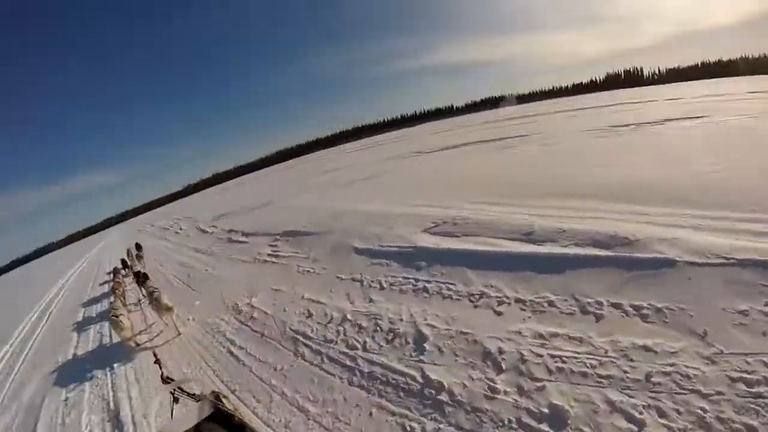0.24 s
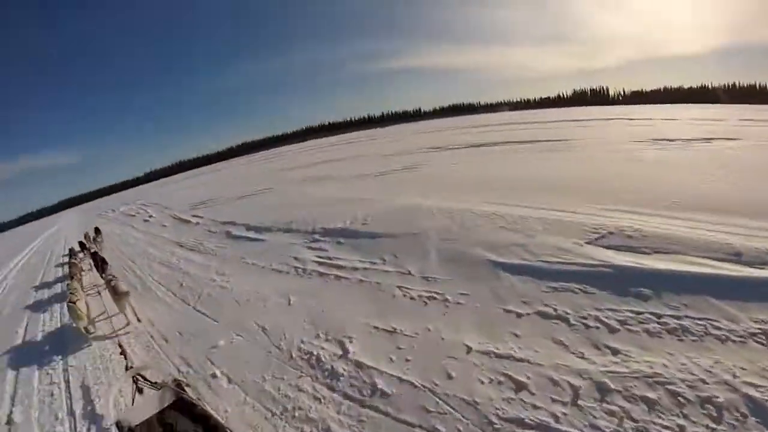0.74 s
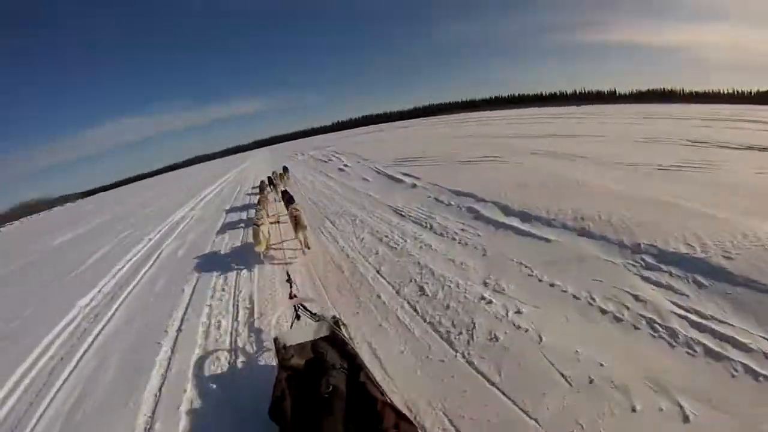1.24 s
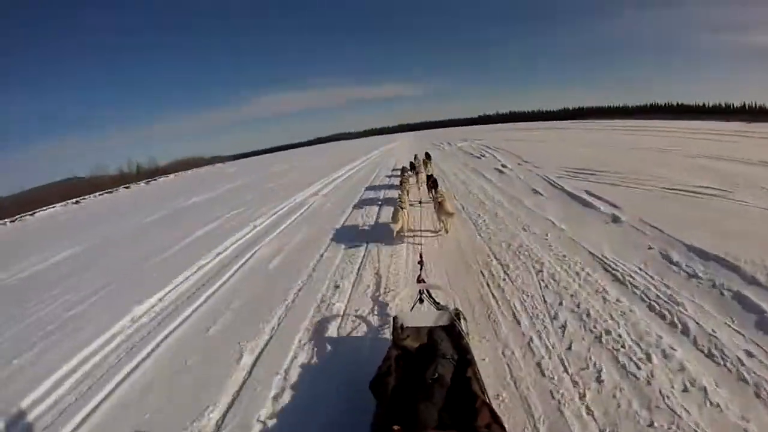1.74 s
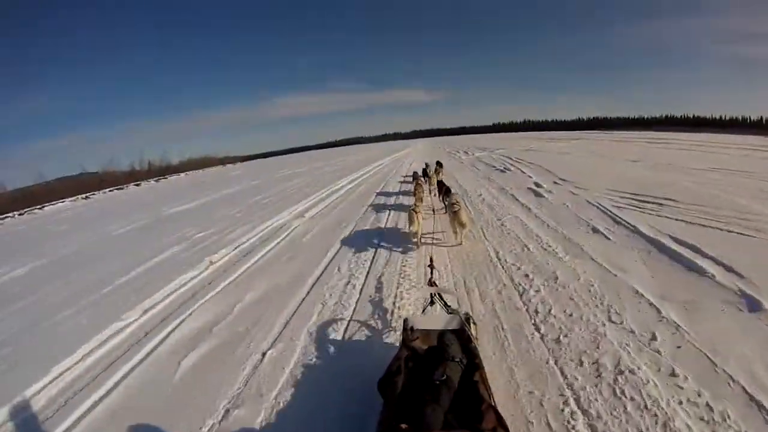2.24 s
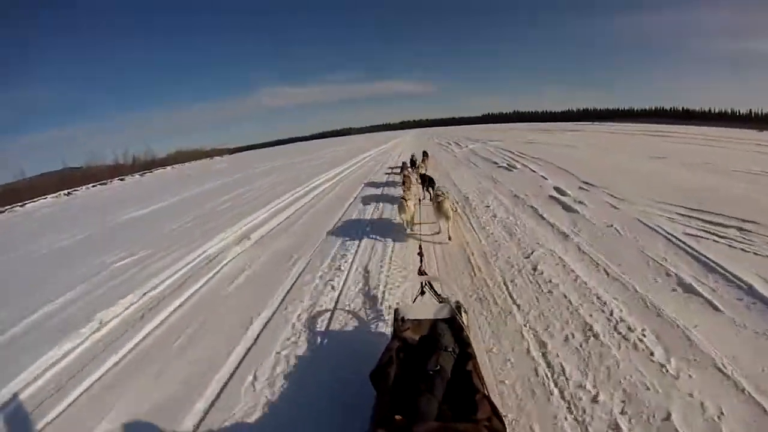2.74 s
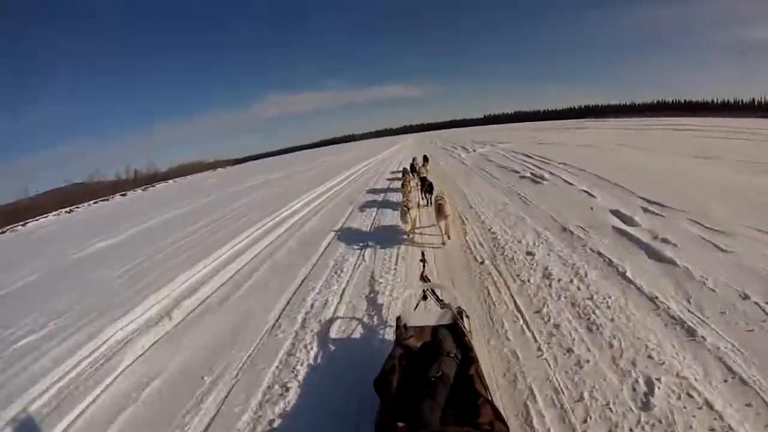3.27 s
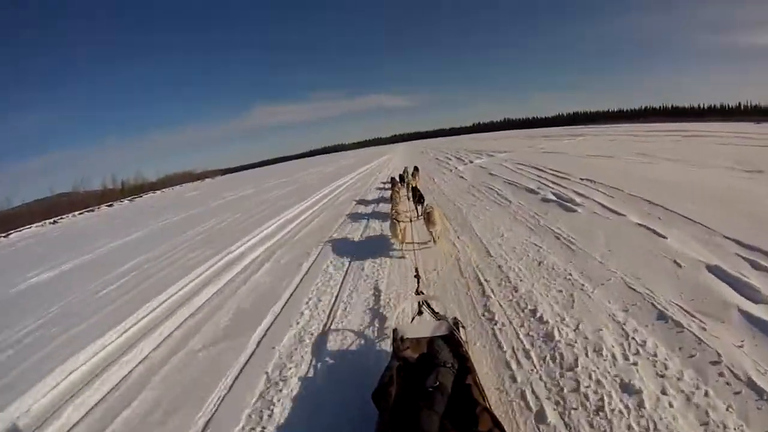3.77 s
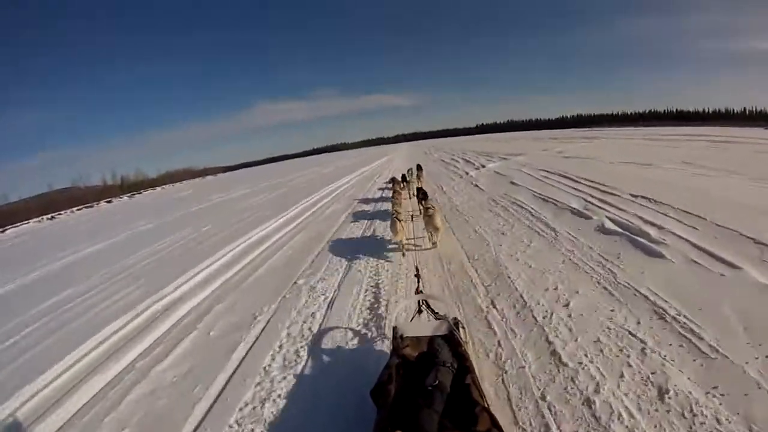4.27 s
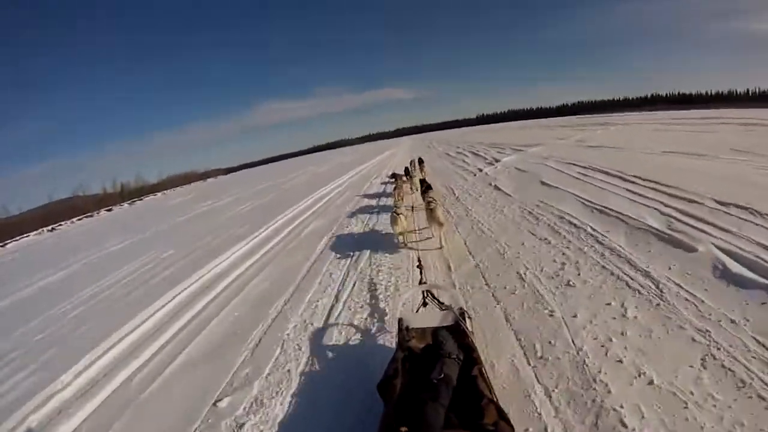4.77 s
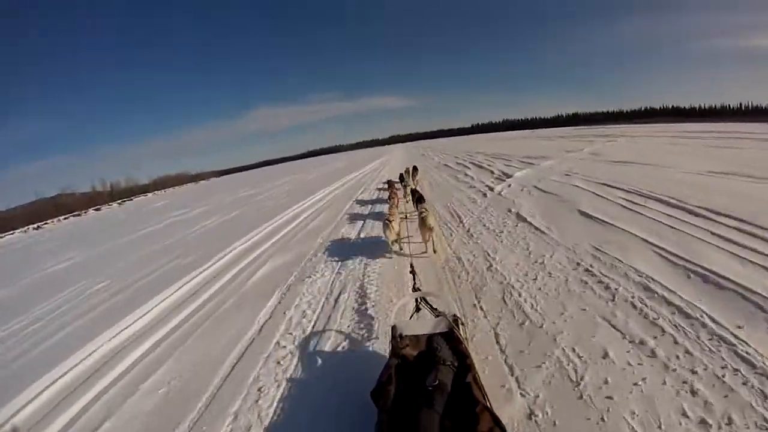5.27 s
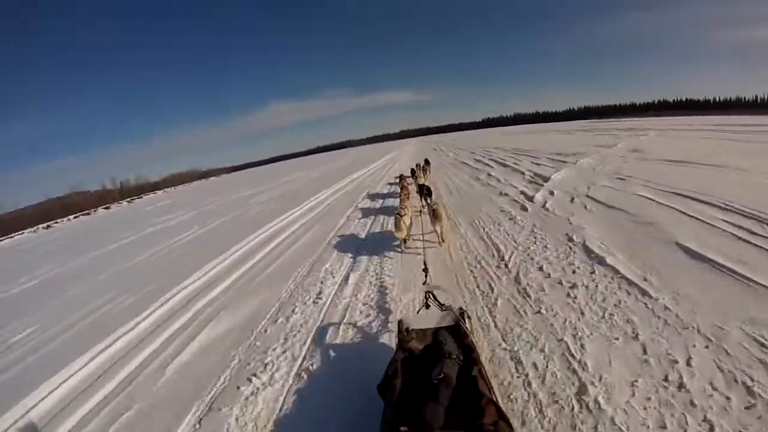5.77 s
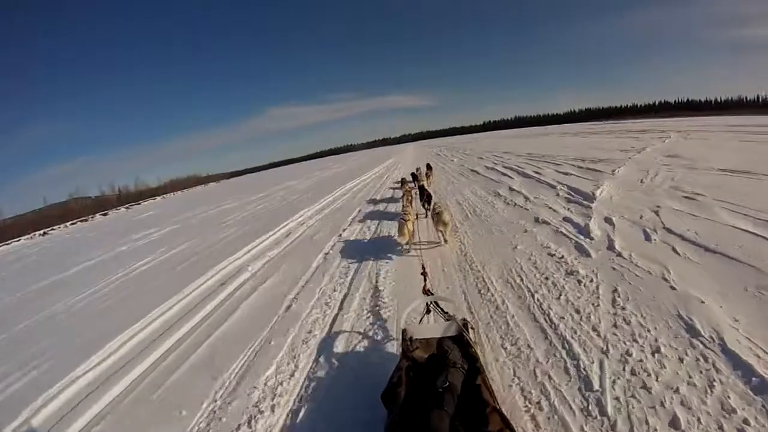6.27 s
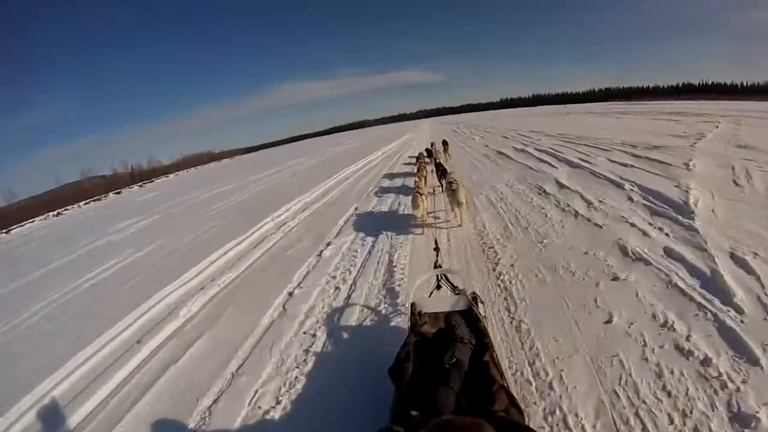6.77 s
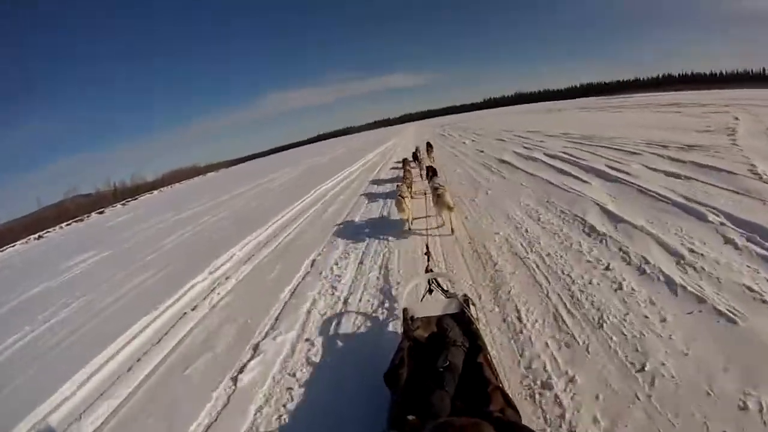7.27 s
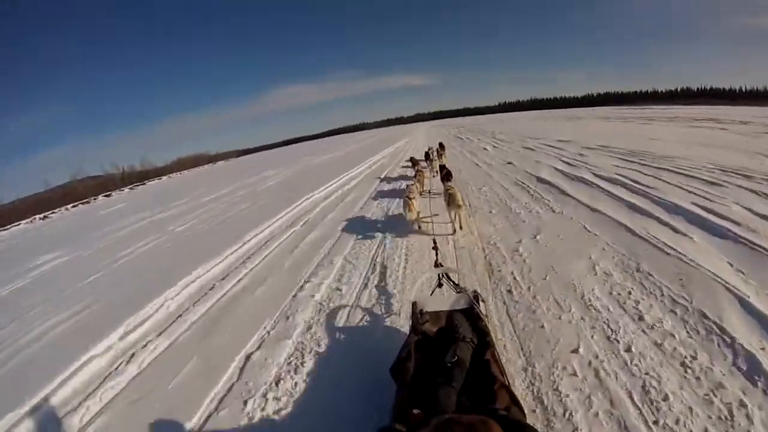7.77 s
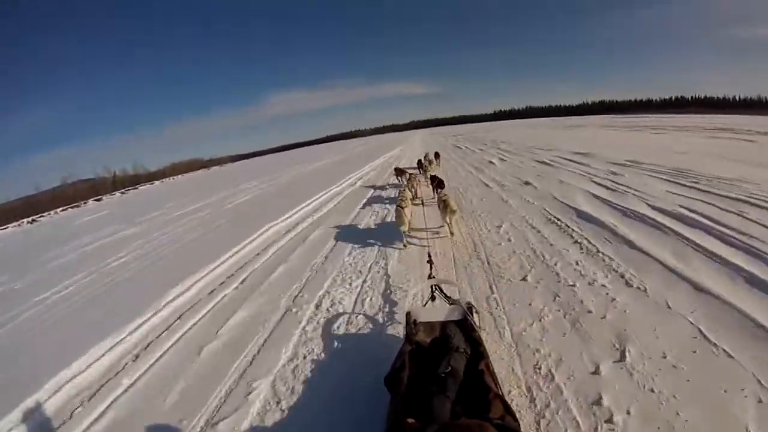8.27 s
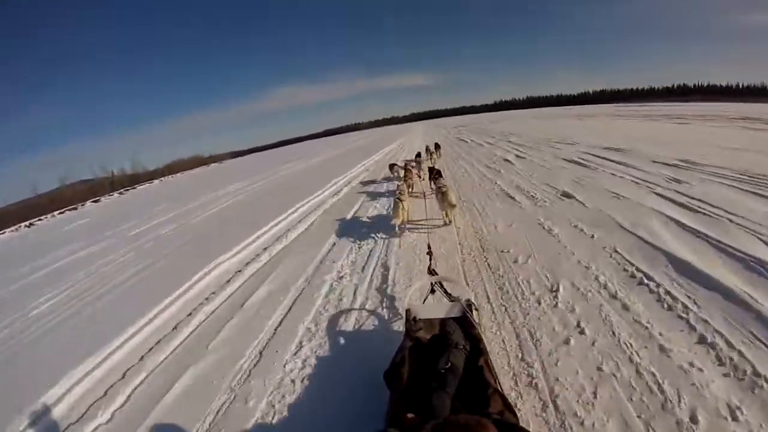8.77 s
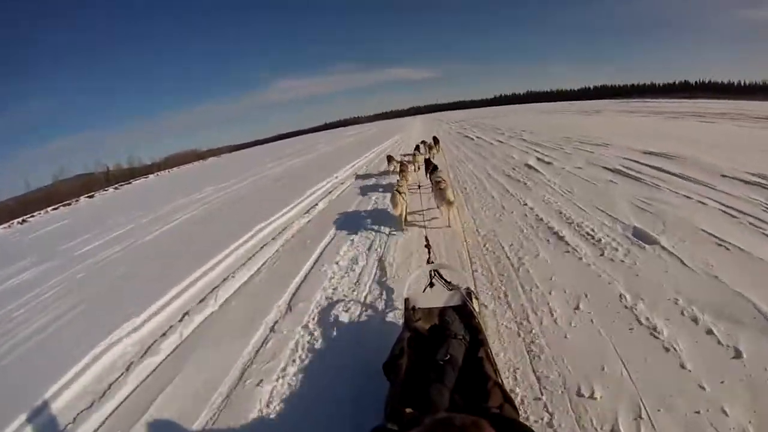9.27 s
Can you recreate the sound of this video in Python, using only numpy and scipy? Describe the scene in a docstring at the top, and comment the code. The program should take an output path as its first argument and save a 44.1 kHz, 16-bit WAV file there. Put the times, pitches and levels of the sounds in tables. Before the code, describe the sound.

Low wind rumbles in gusts against a microphone inside a closed plastic case on a moving dog sled. Beneath it the runners hiss, crunch and faintly squeak on packed snow, the sled drones, and bumps knock hollowly. The wind drops briefly after about three seconds, then harder buffets thump the case, bringing short crackles and a few sharp clicks. Everything is close, muffled and without echo.

```python
"""A dog sled glides over packed snow, heard from inside a closed plastic case worn by the driver.
From the start, head wind rumbles on the case in gusts, the runners hiss, crunch and now and then squeak,
and bumps in the trail knock hollowly. The sled's low drone sinks, then swells at about 1.5 s.
The wind drops away around 3.5 s; from about 4 s on, hard buffets thump the case and make it crackle,
and the mount clicks under strain while the sled runs on."""
import sys
import numpy as np
from scipy import signal
from scipy.fft import rfft, irfft, next_fast_len
from scipy.io import wavfile
from scipy.ndimage import uniform_filter1d

SR = 44100
rng = np.random.default_rng(int(sys.argv[2]) if len(sys.argv) > 2 else 0)


def waveform_to_disk(signal):
    """Save audio, clipped to [-1, 1], as 16-bit WAV at the path in sys.argv[1]."""
    frames = np.transpose(np.atleast_2d(signal))
    scaled = np.clip(frames, -1, 1) * 32767
    samples = np.round(scaled).astype(np.int16)
    wavfile.write(sys.argv[1], SR, samples)


N = 419391
T = np.arange(N) / SR

# the runners on the snow: time_s, glide_db, crust_db (the crunch relative to the glide)
RUNNER_LEVELS = [(0, -47, -14), (0.35, -50.5, -8.5), (0.63, -54, -14), (1.0, -54.5, -9.5),
                 (1.25, -51.5, -11), (2.35, -50.5, -11), (2.7, -53, -9), (3.25, -50.5, -11),
                 (3.55, -52.5, -9.5), (3.85, -49, -11), (4.45, -50.5, -10), (4.85, -50.5, -9),
                 (5.02, -51, -12), (5.2, -52, -8.5), (5.5, -51, -10.5), (5.85, -52, -10), (6.3, -52, -9.5),
                 (6.8, -54.0, -11.5), (7.1, -53.5, -9.5), (7.27, -52.5, -10), (7.45, -53, -10.5),
                 (8.3, -52.5, -9.5), (8.48, -53.5, -12), (8.85, -51.0, -9), (9.5, -53, -10)]


def undb(db):
    """Decibels to gain."""
    return 10 ** (np.asarray(db) / 20)


def unit(x):
    """Scale to rms 1."""
    return x / np.sqrt(np.mean(x ** 2))


def curves(table):
    """One envelope per column of a timed table, in straight lines between its points."""
    time_s, *columns = np.transpose(table)
    return [np.interp(T, time_s, column) for column in columns]


def colour(x, points):
    """Equalise x by (freq_hz, gain_db) points, rolling off beyond both ends; rms 1."""
    hz, db = np.transpose(points)
    size = next_fast_len(N)
    f = np.maximum(np.fft.rfftfreq(size, 1 / SR), 1)
    skirts = np.minimum(f / hz[0], 1) * np.minimum(hz[-1] / f, 1) ** 2
    gain = undb(np.interp(np.log(f), np.log(hz), db))
    return unit(irfft(rfft(x, size) * skirts * gain, size)[:N])


def resonate(x, hz, width_hz):
    """One resonance with gain 1 at its centre."""
    return signal.lfilter(*signal.iirpeak(hz, hz / width_hz, fs=SR), x)


def walk(per_s):
    """A smooth random wobble: levels held 1 / per_s seconds and slewed twice; rms 1."""
    hold = int(SR / per_s)
    stairs = np.repeat(rng.standard_normal(N // hold + 1), hold)
    return unit(uniform_filter1d(uniform_filter1d(stairs, hold), hold)[:N])


def grains(per_s, spread_db):
    """Grit: random tiny impulses, a few larger than the rest; rms 1."""
    hit = rng.random(N) < per_s / SR
    size = undb(spread_db * np.minimum(rng.exponential(size=N), 4))
    return unit(hit * size * rng.choice([-1, 1], N))


def tap(hz, db, size=512):
    """The tightest transient with a given spectrum (minimum phase), at peak 1."""
    f = np.maximum(np.fft.rfftfreq(size, 1 / SR), 1)
    gain = undb(np.interp(np.log(f), np.log(hz), db))
    cepstrum = irfft(np.log(gain))
    response = irfft(np.exp(rfft(2 * cepstrum[:size // 2], size)))
    return response / np.max(np.abs(response))


def add(out, start_s, sound):
    """Mix a sound in at start_s."""
    i = max(int(start_s * SR), 0)
    out[i:i + len(sound)] += sound[:max(N - i, 0)]


def hiss(level_db=-69):
    """A faint, even bed of hiss."""
    # tone of the hiss: freq_hz, gain_db
    hiss_eq = [(1000, 6.5), (3000, 3), (5000, 0), (8000, -1), (10000, -2.5), (12300, -1.5), (13500, -12.5),
               (15000, -8)]
    return undb(level_db) * colour(rng.standard_normal(N), hiss_eq)


def drone(trim_db=-0.5, swell_db=1.0):
    """The uneven trail shakes the sled into a low, swelling drone."""
    # how hard the sled shakes: time_s, level_db
    shaking = [(0, -52), (.7, -59.5), (1.35, -65), (1.6, -48), (2.3, -52.5), (3.1, -57), (3.8, -49.5),
               (4.6, -50), (5.4, -51), (5.75, -49), (6.3, -51), (6.9, -53.5), (7.6, -49), (8.4, -54.5),
               (9.0, -48), (9.5, -53)]
    # tone of the sled's hum: freq_hz, gain_db
    drone_eq = [(70, -17), (105, 0), (132, 4.5), (160, -10), (200, -14), (300, -30)]
    level_db, = curves(shaking)
    envelope = undb(level_db + trim_db + swell_db * walk(9))
    return envelope * colour(rng.standard_normal(N), drone_eq)


def sizzle(usual_db=-78.5, db_per_crunch_db=1.3, flicker_db=2.0):
    """The snow sizzles in two narrow, flickering bands, more so where the runners crunch harder."""
    # resonances of the sizzle: centre_hz, width_hz, gain_db
    modes = [(4590, 300, -2.5), (5176, 440, -0.5)]
    glide_db, crust_db = curves(RUNNER_LEVELS)
    bite_db = glide_db + crust_db - np.median(glide_db + crust_db)
    bands = np.zeros(N)
    for hz, width_hz, gain_db in modes:
        flicker = undb(gain_db + flicker_db * walk(24))
        band = resonate(rng.standard_normal(N), hz, width_hz)
        bands += flicker * resonate(band, hz, width_hz)  # twice through for steeper skirts
    return unit(bands) * undb(usual_db + db_per_crunch_db * bite_db)


def skids():
    """A runner edge shaves the crust in uneven slips: thin squeaks, each a rough, gliding noise band."""
    # squeaks on the crust: start_s, length_s, start_hz, end_hz, width_hz, level_db
    squeaks = [(0.18, 0.28, 2160, 2600, 560, -59), (0.204, .36, 1593, 1700, 900, -62),
               (0.292, .17, 4800, 4450, 380, -70), (0.3, .8, 7120, 6950, 1200, -77),
               (0.798, 0.19, 2270, 2350, 300, -64), (1.242, 0.23, 2250, 2400, 400, -62),
               (1.27, .15, 4800, 4600, 500, -72), (2.339, 0.27, 1650, 2000, 300, -60),
               (2.949, 0.73, 5130, 5150, 900, -75), (3.599, 0.45, 5230, 5170, 800, -71),
               (3.79, .16, 2245, 2360, 400, -59), (3.888, .011, 6200, 5900, 2200, -55),
               (4.42, 0.13, 2250, 2350, 400, -59.5), (4.2, 0.52, 5050, 5050, 1200, -70.5),
               (5.104, 0.24, 1800, 2100, 500, -61), (5.6, 0.2, 2270, 2360, 350, -62),
               (7.325, 0.053, 5170, 5110, 170, -67), (7.355, .1, 4780, 4640, 260, -70),
               (7.371, 0.16, 2275, 2380, 220, -61), (7.615, .045, 4700, 4590, 120, -72),
               (7.74, .08, 4450, 4690, 120, -71), (7.835, .05, 4480, 4680, 120, -74),
               (9.145, .06, 5050, 5100, 260, -70), (9.202, 0.043, 5180, 5220, 200, -65),
               (9.25, 0.09, 5300, 5250, 300, -67)]
    out = np.zeros(N)
    for start_s, length_s, start_hz, end_hz, width_hz, level_db in squeaks:
        n = int(length_s * SR)
        lowpass = signal.butter(2, width_hz / 2, fs=SR, output="sos")
        rasp = unit(signal.sosfilt(lowpass, rng.standard_normal((2, n))))
        phase = 2 * np.pi * np.cumsum(np.linspace(start_hz, end_hz, n)) / SR
        band = (rasp[0] * np.sin(phase) + rasp[1] * np.cos(phase)) / np.sqrt(2)
        add(out, start_s, undb(level_db) * np.hanning(n) * band)
    return out


def runners():
    """Runners rub the packed snow and crush its grains; the contact pressure flutters."""
    # smooth sliding, heard through the case: freq_hz, gain_db
    slide_eq = [(90, 7), (190, 7.5), (260, 4), (350, 2), (440, 4), (525, 4.5), (630, 0), (800, -4),
                (950, -3), (1250, -2.5), (1550, -10.5), (2200, -23), (3500, -33.5)]
    # breaking crust, heard through the case: freq_hz, gain_db
    crunch_eq = [(700, -26), (1300, -7), (1600, -0.5), (1900, 0.5), (2300, 5), (2550, -3.5), (2900, -9.5),
                 (3500, -11.5), (4200, -20), (5700, -18.5), (6200, -15), (7000, -22.5), (12000, -34),
                 (15000, -46)]
    glide_db, crust_db = curves(RUNNER_LEVELS)
    contact = walk(45)
    slide = colour(rng.standard_normal(N) + 0.5 * grains(per_s=900, spread_db=2), slide_eq)
    crunch = colour(rng.standard_normal(N) + 0.67 * grains(per_s=1500, spread_db=4.5), crunch_eq)
    slide *= undb(glide_db + 0.73 * contact)
    crunch *= undb(glide_db + crust_db + 0.53 * contact + 0.8 * walk(18))
    return slide + crunch


def bumps(rise_s=0.004, t60_s=0.13, rough_rad=0.58):
    """Soft jolts ring one hollow resonance of the rig; loose contact roughens the ring."""
    # bumps in the trail: start_s, level_db, pitch_hz
    jolts = [(0.079, -42, 544), (1.111, -44, 508), (1.267, -43, 484), (1.637, -43.5, 560),
             (2.129, -43.2, 532), (2.294, -42, 511), (2.885, -43, 500), (2.915, -41.5, 543),
             (4.47, -44, 490), (6.645, -46, 523), (6.766, -37.5, 516), (7.11, -50, 538),
             (7.165, -42.5, 492), (7.296, -42, 506), (7.551, -39.8, 538), (7.882, -44, 512),
             (8.158, -44.5, 552), (8.922, -46, 517)]
    out, t = np.zeros(N), T[:SR // 4]
    rattle = walk(130)
    envelope = (1 - np.exp(-t / rise_s)) * np.exp(-np.log(1000) * t / t60_s)
    for start_s, level_db, pitch_hz in jolts:
        wobble = rough_rad * np.interp(start_s + t, T, rattle)
        add(out, start_s, undb(level_db) * envelope * np.sin(2 * np.pi * pitch_hz * t + wobble))
    return out


def clicks(neutral_db=-5):
    """The mount slips under strain: each dry snap rings through the plastic case."""
    # slips of the mount: start_s, peak_db, bright_db (neutral_db leaves the treble as it is)
    slips = [(4.2368, -45, 1), (5.3016, -43.5, -5), (7.4747, -39, -9), (7.4763, -43, -8),
             (8.1773, -36.5, -7), (8.3783, -32.5, -5), (9.121, -34.5, -7)]
    # how the case answers a slip: freq_hz, gain_db
    case_eq = [(200, -8), (520, -5), (800, -13), (1200, 2.5), (1700, -1), (2250, 0.5), (2600, -17),
               (2950, -32), (3400, -12), (4000, -14), (4500, -13), (5300, -9.5), (6000, -19), (6800, -28),
               (7500, -22), (11000, -22), (12500, -22), (15000, -40)]
    out = np.zeros(N)
    hz, case_db = np.transpose(case_eq)
    treble_shelf = np.clip(np.log2(hz / 1700) / 2, 0, 1)
    for start_s, peak_db, bright_db in slips:
        snap = tap(hz, case_db + treble_shelf * (bright_db - neutral_db))
        add(out, start_s, undb(peak_db) * snap)
    return out


def crackles(thump_s=0.0088, pivot_hz=2000, scatter_db=2, fade_db=5, gap_jitter=0.45):
    """A hard buffet thumps the case, which gives way in a run of small, uneven steps that swells and dies."""
    # the hardest buffets: start_s, crackle_db, tilt_db_per_octave, gap_s, step_count, thump_db
    buffets = [(3.9352, -44, 0.5, .006, 2, -19), (4.1632, -38.3, 0.5, 0.001, 4, -18),
               (4.227, -34.8, -0.3, 0.00068, 7, -14), (5.297, -39.5, 4, .002, 1, -23),
               (7.1316, -37.3, -0.5, .0016, 4, -21), (8.165, -33.3, 0, 0.0014, 3, -19),
               (8.5974, -41, -1.5, 0.014, 3, -20)]
    # tone of one step of the plastic: freq_hz, gain_db
    step_eq = [(200, -2), (550, 8.5), (1300, 1), (2100, 0.5), (3000, -5), (4000, -8.5), (5800, -11.5),
               (7500, -16.5), (12000, -21), (15000, -25)]
    out = np.zeros(N)
    hz, step_db = np.transpose(step_eq)
    # the thump builds and ebbs symmetrically, centred on the first step
    from_centre = np.abs(np.linspace(-10, 10, int(20 * thump_s * SR)))
    thump = uniform_filter1d((1 - from_centre) * np.exp(-from_centre), size=128)
    for at_s, crackle_db, tilt, gap_s, count, thump_db in buffets:
        step = tap(hz, step_db + tilt * np.log2(hz / pivot_hz))
        add(out, at_s - 10 * thump_s, undb(thump_db) * thump)
        for place in np.linspace(-1, 1, round(count) + 2)[1:-1]:
            peak_db = crackle_db - fade_db * place ** 2 + scatter_db * rng.standard_normal()
            add(out, at_s, undb(peak_db) * step)
            at_s += gap_s * (1 + gap_jitter * rng.uniform(-1, 1))
    return out


def wind(rumble_trim_db=0.5, flutter_trim_db=0.1, turbulence_db=2, even_s=0.036, soften_s=0.068):
    """Large eddies rumble on the case, small ones flutter above; gusts swell both, lulls duck the rumble."""
    # head wind between the gusts: time_s, rumble_db, flutter_db
    head_wind = [(0, -28, -40), (0.2, -24.5, -41), (0.5, -30.5, -45), (0.8, -31.5, -40), (1.1, -28, -40),
                 (1.6, -23, -37.5), (2.15, -24.5, -36.5), (2.55, -26.5, -39), (3.45, -26, -41),
                 (3.7, -24.5, -34.5), (4.1, -23, -53), (4.45, -28, -36.5), (5.3, -24.5, -43),
                 (5.7, -28, -37.5), (6.2, -24.5, -41.5), (7.0, -26, -38), (8.0, -21.5, -41.5),
                 (9.5, -25.5, -36)]
    # gusts, each one smooth swell and fall: start_s, length_s, rumble_db, flutter_db
    gusts = [(0, 0.097, -18, -28.5), (0.777, 0.04, -13.5, -31), (0.885, 0.065, -20.5, -48),
             (1.743, 0.062, -23, -32), (1.837, 0.26, -21, -33.5), (2.723, 0.14, -17, -39),
             (2.885, 0.069, -17, -39), (3.123, 0.043, -19.5, -39), (3.178, 0.15, -24, -33.5),
             (3.79, 0.2, -24.5, -46), (4.04, 0.31, -20, -32.5), (4.572, 0.2, -19.5, -48),
             (4.756, 0.057, -17, -46), (4.945, 0.11, -18, -50), (5.07, 0.043, -19.5, -45),
             (5.288, 0.025, -15.5, -35), (5.983, 0.051, -23, -39), (6.518, 0.056, -16.5, -46),
             (6.88, 0.043, -17.5, -30.5), (6.997, 0.23, -21.5, -43), (7.306, 0.27, -19, -47),
             (7.874, 0.08, -21, -47), (8.145, 0.075, -19, -48), (8.573, 0.07, -16.5, -47),
             (8.88, 0.063, -17, -46), (8.963, 0.26, -20.5, -30)]
    # moments when the wind drops away: middle_s, length_s, depth_db
    lulls = [(0.48, 0.071, 4), (0.656, 0.13, 3), (1.314, 0.1, 6), (4.395, .1, 6.5), (3.092, 0.11, 2.5),
             (3.406, 0.15, 10), (3.532, 0.17, 9), (4.565, .04, 6), (4.755, 0.027, 9), (4.923, 0.075, 11),
             (5.135, .05, 7), (5.19, 0.17, 4), (5.605, 0.056, 7), (5.747, 0.12, 8), (6.62, .08, 4),
             (6.809, 0.095, 7), (8.751, 0.057, 11)]
    # tone of the large eddies: freq_hz, gain_db
    rumble_eq = [(8, -14.5), (15, -11), (23, 1.5), (37, -0.5), (52, -10), (68, -16), (90, -27), (130, -51)]
    # tone of the small eddies: freq_hz, gain_db
    flutter_eq = [(45, -31), (62, -4.5), (78, -1), (102, -12.5), (128, -21.5), (165, -38), (300, -40),
                  (600, -78)]
    turbulence = np.array([walk(per_s=20), walk(per_s=20)])
    rumble_power, flutter_power = undb(np.array(curves(head_wind)) + turbulence_db * turbulence) ** 2
    for start_s, length_s, rumble_db, flutter_db in gusts:
        swell = np.hanning(int(length_s * SR))
        add(rumble_power, start_s, undb(rumble_db) ** 2 * swell)
        add(flutter_power, start_s, undb(flutter_db) ** 2 * swell)
    duck_db = np.zeros(N)
    for middle_s, length_s, depth_db in lulls:
        add(duck_db, middle_s - length_s / 2, depth_db * np.hanning(int(length_s * SR)))
    rumble = colour(rng.standard_normal(N), rumble_eq)
    # even out the noise's own swells, so the gusts set the force of the eddies
    strength = np.sqrt(uniform_filter1d(np.abs(signal.hilbert(rumble)) ** 2, int(even_s * SR)))
    rumble = unit(rumble / uniform_filter1d(strength, int(soften_s * SR)))
    rumble *= undb(rumble_trim_db - duck_db) * np.sqrt(rumble_power)
    flutter = colour(rng.standard_normal(N), flutter_eq)
    flutter *= undb(flutter_trim_db) * np.sqrt(flutter_power)
    return rumble + flutter


def scene():
    """A mono mix, all close and dry: open snow gives no echo."""
    return (hiss() + wind() + drone() + runners() + skids() + sizzle() + bumps() + clicks() + crackles())[None]


def record(dry):
    """A steep low-pass cuts the very top."""
    top_hz = 15200
    return signal.sosfilt(signal.ellip(8, 0.2, 70, top_hz, fs=SR, output="sos"), dry)


dry = scene()
out = record(dry)
waveform_to_disk(out)
```